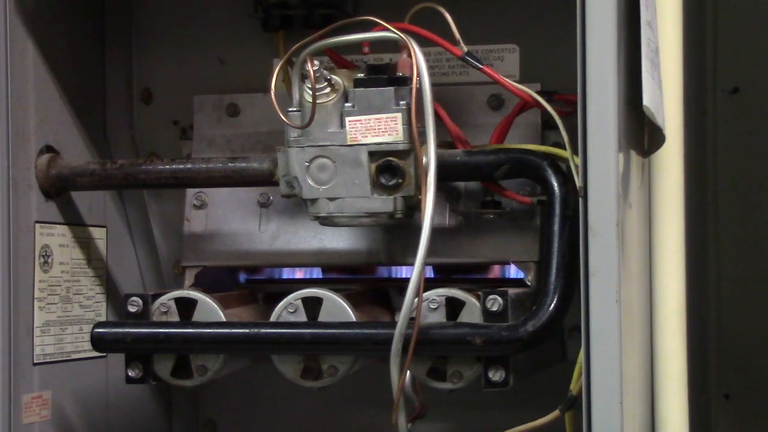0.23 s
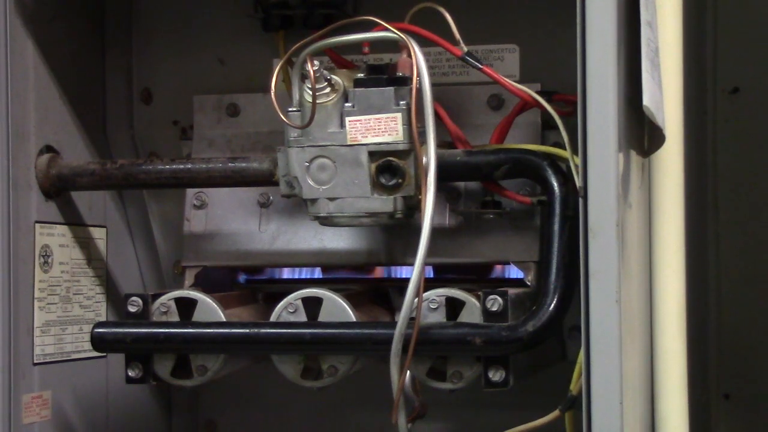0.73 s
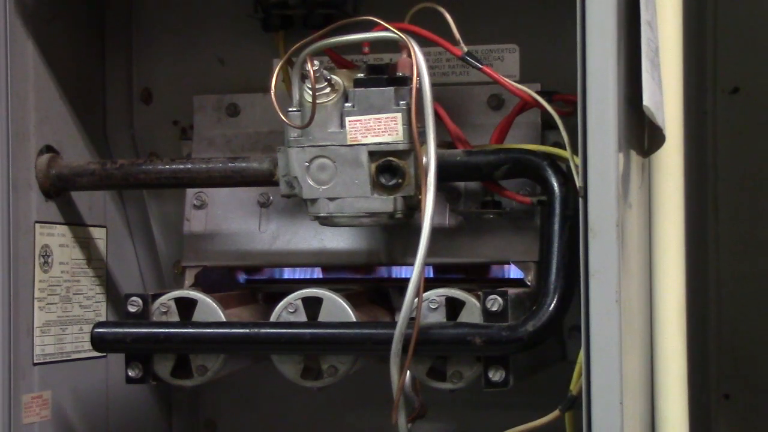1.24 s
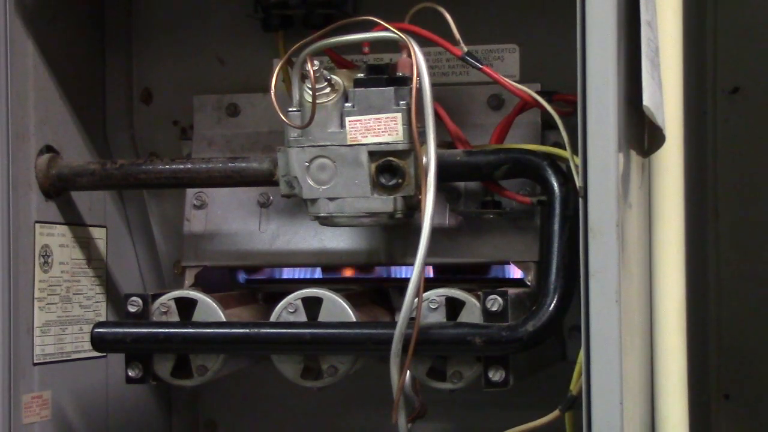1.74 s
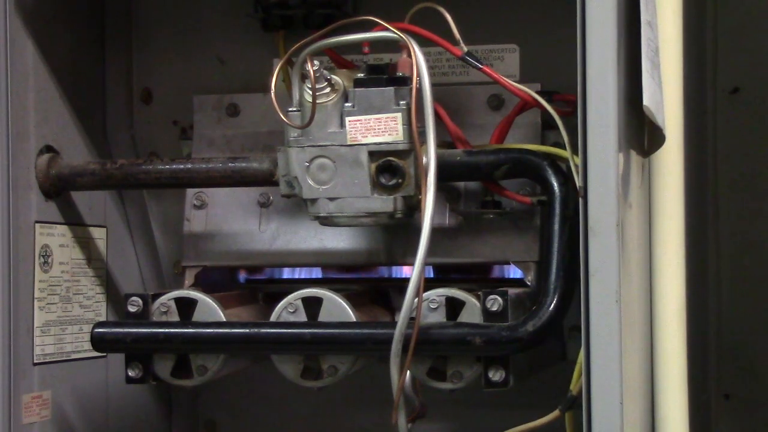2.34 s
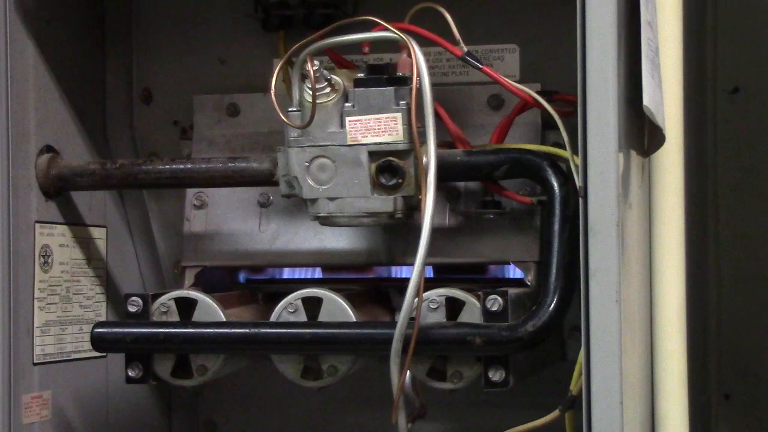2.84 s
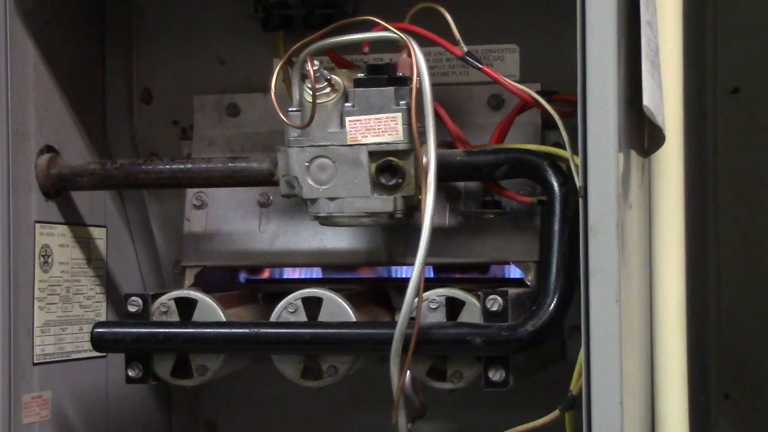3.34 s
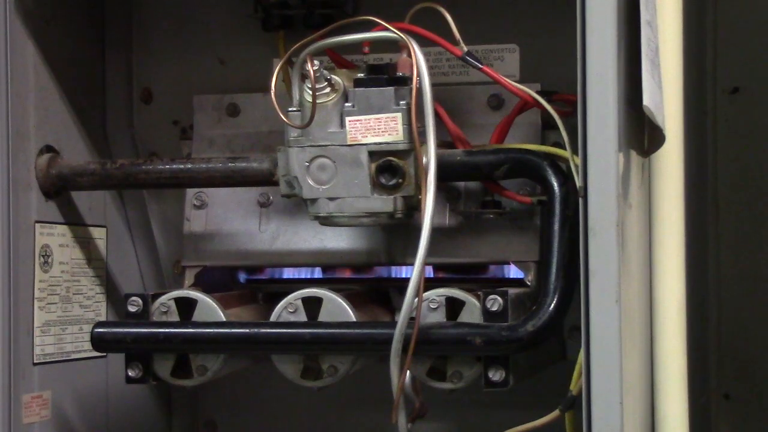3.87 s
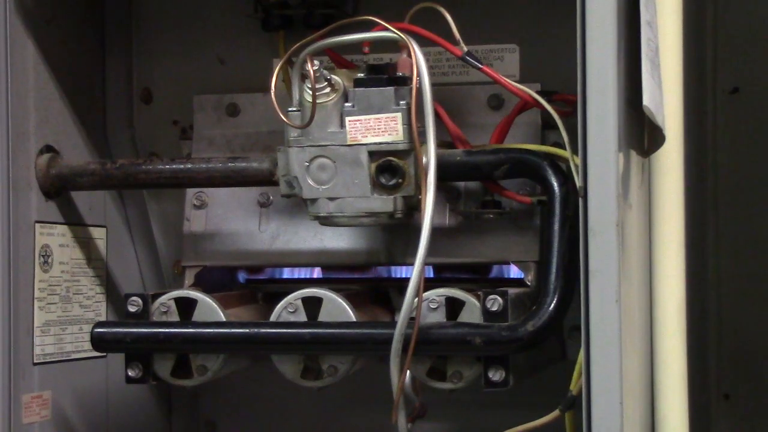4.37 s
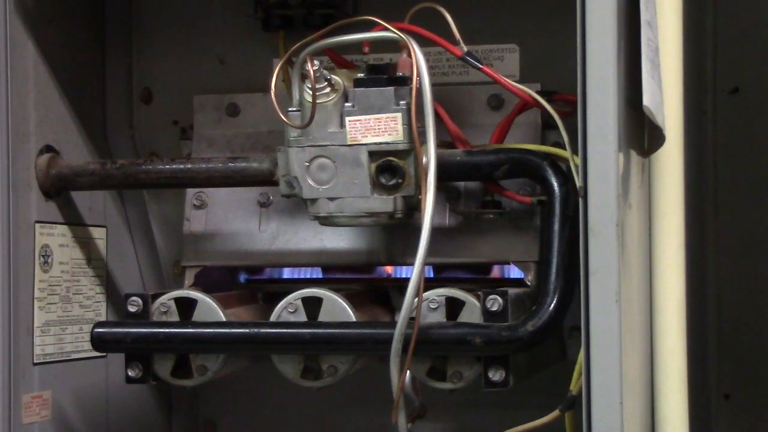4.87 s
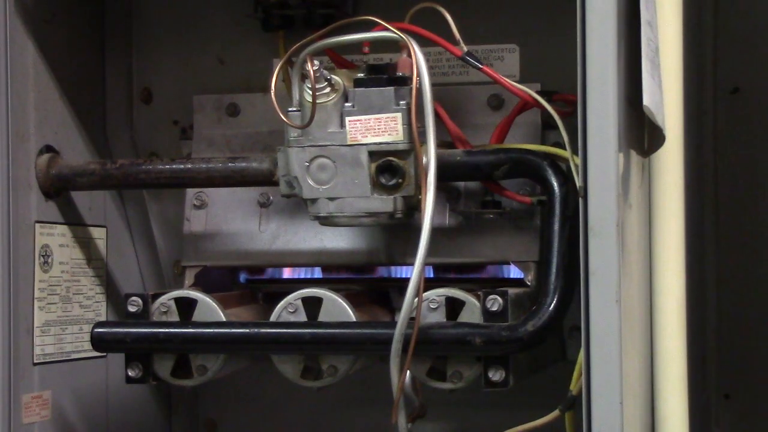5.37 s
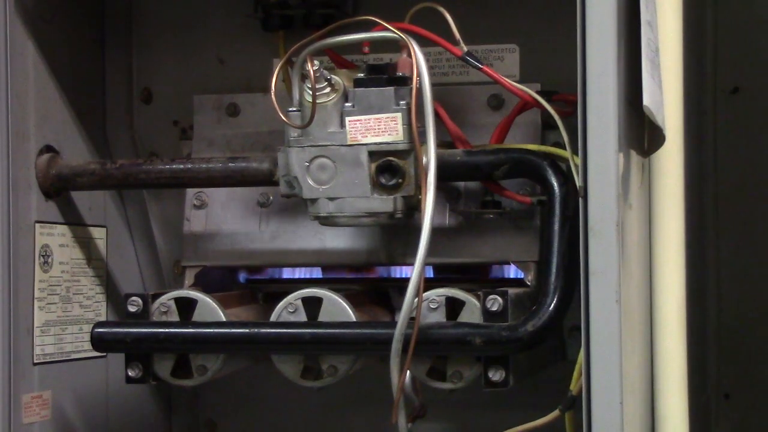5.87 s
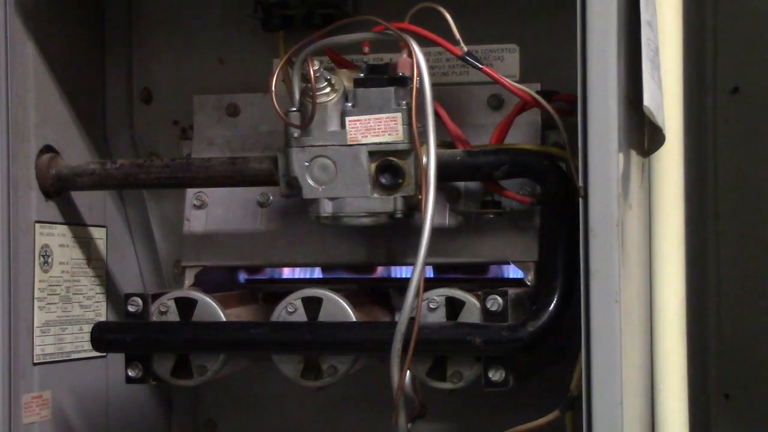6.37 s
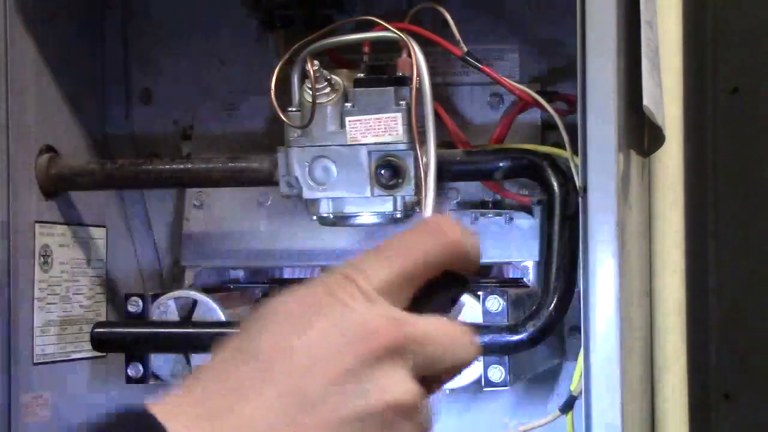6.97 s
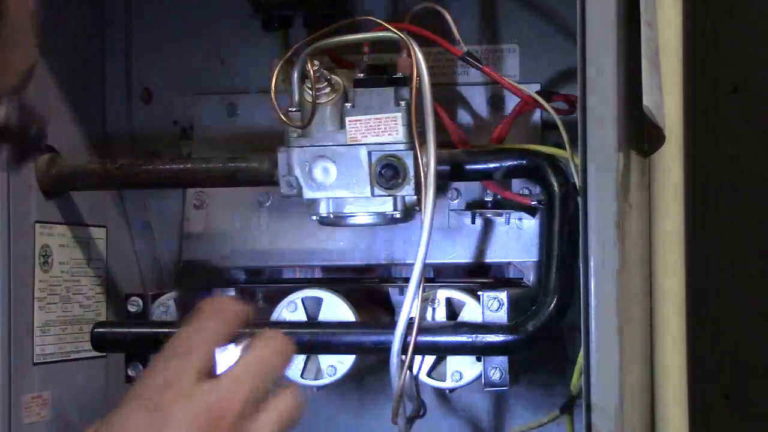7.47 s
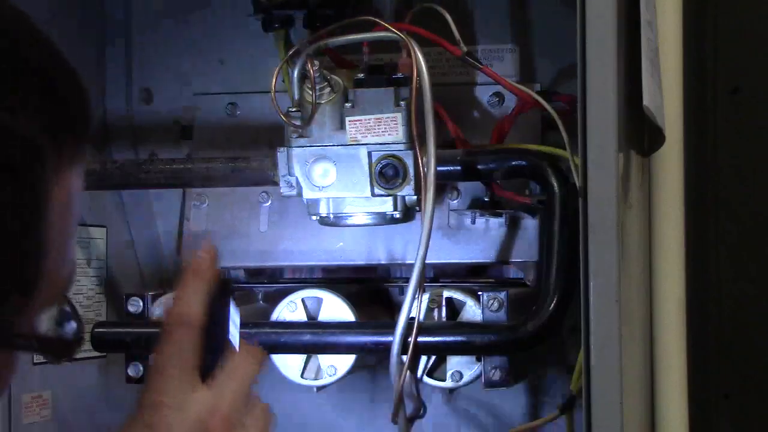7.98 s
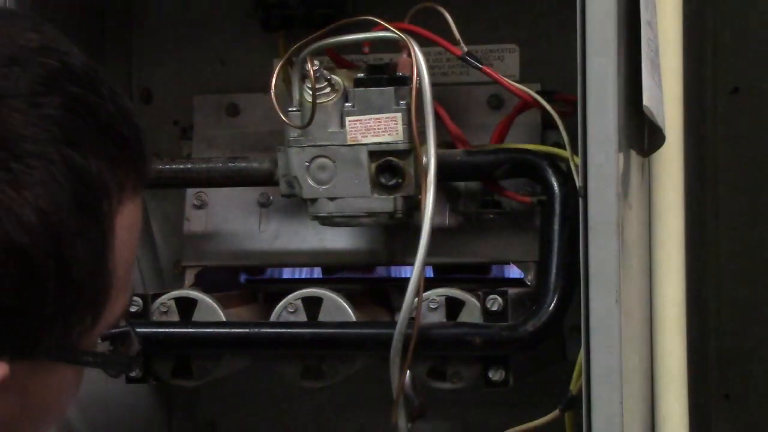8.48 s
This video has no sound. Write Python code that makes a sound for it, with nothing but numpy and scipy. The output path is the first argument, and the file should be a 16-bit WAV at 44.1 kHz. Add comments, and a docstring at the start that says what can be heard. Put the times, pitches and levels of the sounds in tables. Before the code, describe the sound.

Over steady gas burner hiss and ticking metal, someone walks up, knocks and drags things squeakily, then clicks a flashlight on and off.

```python
"""A gas furnace burns steadily with its panel off: jet noise is filtered by the resonances of burner
tubes and sheet-metal cabinet, flames murmur and hot metal ticks. Someone walks up with dull steps,
knocks things about, slides one along and drags something with a loud, squeaky stick-slip scrape.
Then, close to the microphone, the spring switch of a flashlight clicks on and, a little later, off."""
import sys
import numpy as np
from scipy import signal
from scipy.fft import rfft, irfft, next_fast_len
from scipy.io import wavfile

SR = 44100
rng = np.random.default_rng(int(sys.argv[2]) if len(sys.argv) > 2 else 0)


def output_pcm(signal):
    """Save a mono or channel-first signal as 16-bit PCM at the path in sys.argv[1].

    Samples are clipped to [-1, 1] before scaling.
    """
    pcm = np.clip(np.atleast_2d(signal).T, -1, 1) * 32767
    wavfile.write(sys.argv[1], SR, np.round(pcm).astype(np.int16))


N = 384111


def amp(db):
    """Amplitude ratio of a level in decibels."""
    return 10 ** (np.asarray(db) / 20)


def rms_one(x):
    """Normalisation to unit rms."""
    return x / np.sqrt(np.mean(x ** 2) + 1e-20)


def at_hz(points, hz):
    """Interpolation of (frequency, value) points on a logarithmic frequency axis."""
    points_hz, values = np.transpose(points)
    return np.interp(np.log(hz + 1e-3), np.log(points_hz), values)


def bell(hz, centre_hz, width_hz):
    """Gaussian resonance curve of height 1, given its full width at half height."""
    return np.exp2(-np.minimum((2 * (hz - centre_hz) / width_hz) ** 2, 40))


def noise(colour, size):
    """Spectral shaping: noise whose power density in dB is colour(hz)."""
    hz = np.fft.rfftfreq(size, 1 / SR)
    return irfft(rfft(rng.standard_normal(size)) * amp(colour(hz)), size) * np.sqrt(SR / 2)


def drift(per_s):
    """Random modulation of unit rms, gliding through per_s new values a second."""
    position = np.arange(N) / SR * per_s
    return rms_one(np.interp(position, np.arange(N), rng.standard_normal(N)))


def burst(colour, rise_s, t60_s):
    """Impact on a body of high modal density: noise with a quick rise and exponential decay."""
    t = np.arange(SR // 2) / SR
    envelope = np.minimum(t / rise_s, 1) * amp(-60 * np.maximum(t - rise_s, 0) / t60_s)
    return rms_one(noise(colour, len(t))) * envelope


def add(out, start_s, sound):
    """Superposition of a sound onto out."""
    start = int(start_s * SR)
    out[start:start + len(sound)] += sound[:N - start]


def high_pass(x, edge_hz):
    """Fourth-order causal attenuation of the bass."""
    return signal.sosfilt(signal.butter(4, edge_hz, "high", fs=SR, output="sos"), x + 1e-18)


def room(x, wet_db, near_db, near_t60_s):
    """Reverberation: direct sound, early reflections off nearby metal and a small basement's tail."""
    # reverberation time of the basement: frequency_hz, t60_s
    decay_times = [(150, 0.65), (1000, 0.32), (4000, 0.24), (14000, 0.16)]
    t = np.arange(SR // 2) / SR
    edges_hz = np.geomspace(40, 18000, num=9)
    tail = 0
    for low, high in zip(edges_hz, edges_hz[1:]):
        band_pass = signal.butter(2, [low, high], "band", fs=SR, output="sos")
        band = signal.sosfilt(band_pass, rng.standard_normal(len(t)))
        tail = tail + band * amp(-60 * t / at_hz(decay_times, np.sqrt(low * high)))
    near = rng.standard_normal(len(t)) * amp(-60 * t / near_t60_s)
    echoes = amp(wet_db) * rms_one(tail * (t > .005)) + amp(near_db) * rms_one(near * (t > .001))
    return x + signal.fftconvolve(x, echoes / np.sqrt(len(t)))[:N]


def burners():
    """Source and filter: jet noise excites fixed resonances; whistles flutter and flames murmur."""
    # noise spectrum of jets and flames: frequency_hz, density_db
    jet_spectrum = [(30, -107.0), (90, -105.0), (150, -100.9), (300, -91), (600, -84.5), (1100, -83.0),
                    (2500, -88), (5500, -88.5), (10000, -94.5), (15500, -91)]
    # resonances and notches of burner tubes and cabinet: centre_hz, width_hz, gain_db
    cabinet = [(833, 63, 8), (1210, 81, -4), (1460, 160, -1), (1700, 144, 4), (2034, 69, 3.5),
               (2594, 49, 7), (2856, 46, 5), (2990, 127, -6), (3146, 107, 8), (3226, 134, -4.5),
               (3787, 96, 6), (3838, 92, -11), (4177, 83, -2.5), (4500, 61, 7.5), (5100, 46, -22),
               (5300, 500, 4), (6010, 57, 7), (7460, 130, 2.5), (8070, 200, 5), (8460, 370, 6.5),
               (9140, 420, 3.5), (10000, 130, -0.5), (11520, 560, 4.5), (12273, 92, 10), (12639, 90, 3),
               (13716, 90, -14), (13975, 380, 7.6), (14556, 130, -15), (15116, 90, -9), (15482, 190, -16)]
    # thin whistles of the jets: pitch_hz, level_db, pitch_waver_ratio
    jet_tones = [(861, -61.5, 0.00692), (3146, -69, .002)]
    shade_from_s, shade_db_per_s, shade_above_hz = 6.7, 0.5, 7400
    flutter_db, murmur_db, murmur_waver_db = 5, -74.5, 2.5
    size = next_fast_len(N)
    resonances = lambda hz: sum(db * bell(hz, centre, width) for centre, width, db in cabinet)
    hiss = noise(lambda hz: at_hz(jet_spectrum, hz) + resonances(hz), size)[:N]
    # acoustic shadow: a body comes between and shades the jets' sizzle
    shade_db = -shade_db_per_s * np.maximum(np.arange(N) / SR - shade_from_s, 0)
    sizzle = signal.sosfiltfilt(signal.butter(2, shade_above_hz, "high", fs=SR, output="sos"), hiss)
    hiss += (amp(shade_db) - 1) * sizzle
    flame_spectrum = [(60, -52), (300, 15), (700, 0), (2000, -39)]   # frequency_hz, relative_db
    murmur = rms_one(noise(lambda hz: at_hz(flame_spectrum, hz), size)[:N])
    whistles = 0
    for pitch_hz, db, waver in jet_tones:
        phase = 2 * np.pi * np.cumsum(pitch_hz * (1 + waver * drift(per_s=40))) / SR
        whistles = whistles + np.sin(phase) * amp(db + flutter_db * drift(per_s=14))
    return hiss + whistles + murmur * amp(murmur_db + murmur_waver_db * drift(per_s=9.1))


def ticks(per_s, level_db):
    """Thermal expansion: hot metal gives tiny bright ticks at uneven intervals."""
    out = np.zeros(N)
    for start_s in np.cumsum(rng.uniform(.3, 1.7, size=80)) / per_s:
        if start_s < N / SR:
            tick = burst(lambda hz: 25 * bell(hz, 8900, 6000), rise_s=.0003, t60_s=0.03)
            add(out, start_s, amp(level_db + 2 * rng.standard_normal()) * tick)
    return out


def footsteps():
    """Soft impacts of soles on the floor: firmer contact is quicker, shorter and wider in bandwidth."""
    # footfalls: start_s, level_db
    steps = [(1.111, -46.5), (1.53, -51), (1.885, -47), (2.204, -41.5), (2.533, -44.5), (2.884, -41.5),
             (3.194, -43.5), (3.603, -45), (4.157, -38), (4.398, -51), (4.714, -36), (5.29, -53)]
    # response of the floor: frequency_hz, relative_db
    floorboard = [(60, 3), (110, -1.5), (190, -4), (330, 3.5), (480, -1), (900, 2), (2000, -1), (8000, -11)]
    ordinary_db, rise_halves_db, t60_halves_db, cutoff_doubles_db = -44, 5, 13.5, 10
    boom_hz, boom_hz_per_s = 85, 22   # the lowest boom climbs as the walker nears the furnace
    out = np.zeros(N)
    for start_s, db in steps:
        firmer_db = db - ordinary_db
        rise_s = 0.0068 * .5 ** (firmer_db / rise_halves_db)
        t60_s = 0.25 * .5 ** (firmer_db / t60_halves_db)
        cutoff_hz = 850 * 2 ** (firmer_db / cutoff_doubles_db)
        colour = lambda hz: at_hz(floorboard, hz) - 10 * np.log10(1 + (hz / cutoff_hz) ** 4)
        thud = high_pass(burst(colour, rise_s, t60_s), edge_hz=boom_hz + boom_hz_per_s * start_s)
        add(out, start_s, amp(db) * thud)
    return room(out, wet_db=-13, near_db=-14, near_t60_s=0.058)


def knocks():
    """Impact resonance of small hard things: a short tap has one clear ring, a longer rattle blurs it."""
    # things picked up and put down: start_s, level_db, t60_s, ring_hz
    taps = [(3.73, -30.5, 0.12, 1310), (3.745, -31, .07, 1350), (3.754, -23, 0.07, 1650),
            (3.760, -21, 0.05, 1180), (3.859, -33, 0.068, 1510), (3.891, -40, 0.23, 2400),
            (3.959, -35, 0.19, 2300), (4.040, -38.5, 0.16, 3200), (4.383, -27, 0.1, 3280),
            (4.418, -27.5, 0.063, 2270), (4.565, -32, 0.044, 2420), (4.637, -31, .035, 2560),
            (4.691, -31.5, .037, 2400), (4.714, -29, 0.017, 1100), (4.954, -39.5, .05, 1900),
            (5.066, -35, 0.037, 2000), (5.383, -34, 0.12, 1820)]
    # response of the struck things: frequency_hz, relative_db
    body = [(60, -48), (200, -14), (450, -9.5), (800, -1), (1600, -1.5), (3500, -4), (4600, -10.5),
            (7000, -10), (11000, -19), (16000, -26)]
    clean_ring_db, ring_loss_db_per_s = 14, 61
    out = np.zeros(N)
    for start_s, db, t60_s, ring_hz in taps:
        ring_db = clean_ring_db - ring_loss_db_per_s * t60_s
        colour = lambda hz: at_hz(body, hz) + ring_db * bell(hz, ring_hz, width_hz=0.4 * ring_hz)
        add(out, start_s, amp(db) * burst(colour, rise_s=.001, t60_s=t60_s))
    return room(high_pass(out, edge_hz=220), wet_db=-8, near_db=-18, near_t60_s=0.041)


def stroke(start_s, attack_s, hold_s, t60_s):
    """Amplitude envelope of one movement: linear rise, hold and exponential decay."""
    t = np.arange(SR) / SR
    decay = amp(-60 * np.maximum(t - attack_s - hold_s, 0) / t60_s)
    gain = np.zeros(N)
    add(gain, start_s, np.minimum(t / attack_s, 1) * decay)
    return gain


def friction(body, grain_db, slips_per_s):
    """Friction noise: uneven slips of one surface over another shake a body."""
    rub = noise(lambda hz: at_hz(body, hz), next_fast_len(N))[:N]
    return rms_one(rub * amp(grain_db * drift(slips_per_s)))


def slide():
    """Sliding friction of something light on a shelf; each push slackens as it goes."""
    # light pushes: start_s, attack_s, hold_s, level_db
    pushes = [(5.098, .01, 0.18, -38.5), (6.223, .032, 0.01, -37.5), (6.403, 0.013, .03, -42)]
    # spectrum of the rubbing: frequency_hz, relative_db
    body = [(100, -25), (450, -21), (750, -2), (1050, -7), (1450, -0.5), (2400, -7.5), (3200, -12.5),
            (6000, -26), (16000, -36)]
    sag_db_per_s = 34
    t = np.arange(N) / SR
    push = np.zeros(N)
    for start_s, attack_s, hold_s, db in pushes:
        sag_db = sag_db_per_s * np.maximum(t - start_s, 0)
        push += amp(db - sag_db) * stroke(start_s, attack_s, hold_s, t60_s=0.18)
    rub = high_pass(friction(body, grain_db=2, slips_per_s=230), edge_hz=270)
    return room(push * rub, wet_db=-6.5, near_db=-2, near_t60_s=0.031)


def bumps():
    """Damped impacts: each blunt collision excites a broad band around its own centre frequency."""
    # things bumping into each other: start_s, level_db, t60_s, centre_hz
    collisions = [(6.012, -36, 0.037, 352), (6.042, -43, 0.045, 330), (6.447, -24, 0.02, 6700),
                  (6.449, -30, 0.35, 850), (6.490, -18, 0.086, 610), (6.537, -10.5, .05, 2030)]
    out = np.zeros(N)
    for start_s, db, t60_s, centre_hz in collisions:
        colour = lambda hz: -7 * np.log2((hz + 1) / centre_hz) ** 2
        add(out, start_s, amp(db) * burst(colour, rise_s=0.00033, t60_s=t60_s))
    return room(high_pass(out, edge_hz=220), wet_db=-11, near_db=-23, near_t60_s=0.06)


def drag():
    """Stick-slip friction: a rough scrape in growing jerks squeals, squeaks and comes to rest."""
    # jerks of the hard drag: start_s, level_db
    jerks = [(6.444, -30), (6.489, -26), (6.510, -25), (6.534, -17.5)]
    # the surfaces catch and squeak, dying away: start_s, level_db
    catches = [(6.561, -9), (6.571, -15), (6.586, -13.5), (6.605, -23), (6.637, -28.5)]
    # spectrum of the scrape: frequency_hz, relative_db
    body = [(30, -34), (100, -35), (175, -16), (330, -5), (500, -5.5), (780, 1.5), (1050, -1.5),
            (1400, 0.5), (1900, -6), (4200, -3), (6500, -10), (9500, -16), (16000, -28)]
    pull = sum(amp(db) * stroke(s, attack_s=0.0024, hold_s=0.014, t60_s=0.3) for s, db in jerks)
    catch = sum(amp(db) * stroke(s, attack_s=0.0037, hold_s=0.002, t60_s=0.03) for s, db in catches)
    # one shrill squeal before the hardest jerk
    squeal = amp(-19) * stroke(start_s=6.513, attack_s=0.0037, hold_s=0.002, t60_s=0.1)
    out = pull * friction(body, grain_db=1.56, slips_per_s=300)
    out += catch * squeak(pitch_hz=3470, waver=0.0214, octave_db=-12.5)
    out += squeal * squeak(pitch_hz=7200, waver=0.04, octave_db=-8)
    return room(out, wet_db=-12, near_db=-24, near_t60_s=0.064)


def squeak(pitch_hz, waver, octave_db):
    """Self-excited oscillation: stick and slip lock into an unsteady tone with its octave."""
    phase = 2 * np.pi * np.cumsum(pitch_hz * (1 + waver * drift(per_s=760))) / SR
    return rms_one(np.sin(phase) + amp(octave_db) * np.sin(2 * phase))


def chatter(t60_s):
    """Broadband excitation: a dying run of tiny contacts with a flat spectrum and unit energy."""
    t = np.arange(SR // 10) / SR
    contacts = rng.standard_normal(len(t)) * amp(-60 * t / t60_s)
    phase = np.angle(rfft(contacts, SR))
    return irfft(np.exp(1j * phase), SR)[:len(t)]


def flashlight():
    """Snap-through of the switch spring rings two damped modes of the casing, which rattles briefly."""
    # switch pressed and let go twice:
    # start_s, snap_db, low_mode_hz, low_gain_db, high_mode_hz, high_gain_db, rattle_gain_db
    clicks = [(6.8258, -14, 1760, 19, 4460, 14, 3), (6.988, -1.5, 3060, 6.5, 3900, -4, 1.5),
              (8.1805, -12, 2720, 20.5, 6600, 12.5, 2), (8.3466, -4, 3830, 18, 7230, 16.5, -23)]
    low_width_hz, high_width_hz, cutoff_hz = 700, 1280, 12300
    out = np.zeros(N)
    for start_s, db, low_hz, low_db, high_hz, high_db, rattle_db in clicks:
        contact = chatter(t60_s=0.0041) + amp(rattle_db) * chatter(t60_s=0.047)
        snap = contact.copy()
        for hz, ring_db, width_hz in (low_hz, low_db, low_width_hz), (high_hz, high_db, high_width_hz):
            mode = signal.iirpeak(hz, hz / width_hz, fs=SR)
            snap += amp(ring_db) * signal.lfilter(*mode, contact)
        add(out, start_s, amp(db) * high_pass(snap, edge_hz=0.64 * low_hz))
    out = signal.sosfilt(signal.butter(2, cutoff_hz, fs=SR, output="sos"), out + 1e-18)
    return room(out, wet_db=-15, near_db=-9, near_t60_s=0.044)


def scene():
    """Superposition of all sources at one microphone, alike in both channels."""
    furnace = burners() + ticks(per_s=5.5, level_db=-47)
    mono = furnace + footsteps() + knocks() + slide() + bumps() + drag() + flashlight()
    return np.array([mono, mono])


def record(dry):
    """Soft saturation rounds the highest peaks, and a steep low-pass limits the bandwidth."""
    ceiling, cutoff_hz = .9, 15900
    rounded = dry / (1 + (dry / ceiling) ** 12) ** (1 / 12)
    low_pass = signal.firwin(401, cutoff_hz, fs=SR)
    return signal.fftconvolve(rounded, low_pass[None], mode="same", axes=1)


dry = scene()
out = record(dry)
output_pcm(out)
```